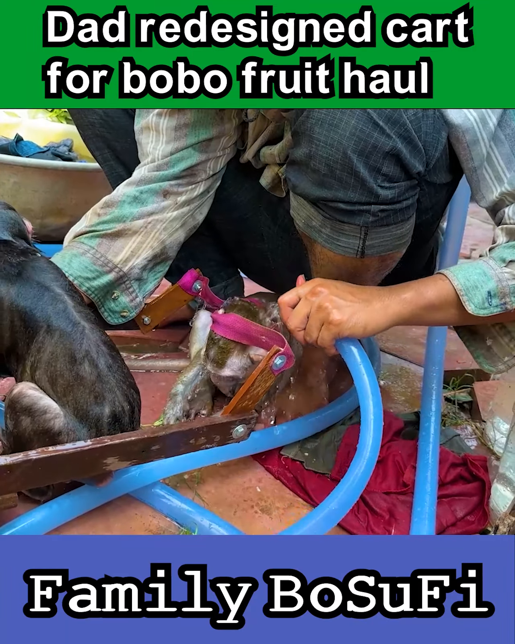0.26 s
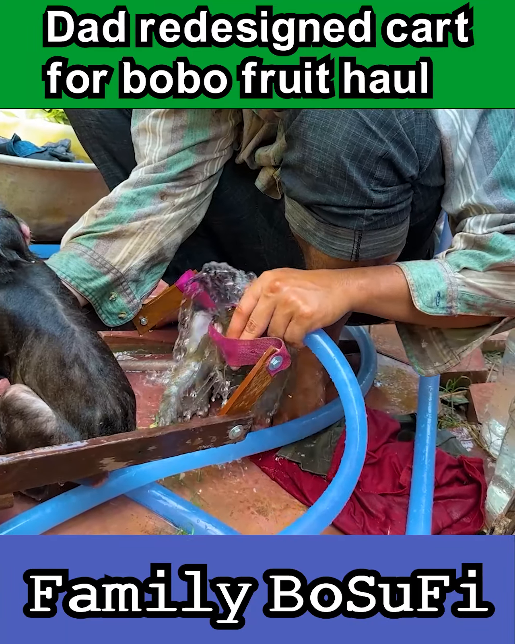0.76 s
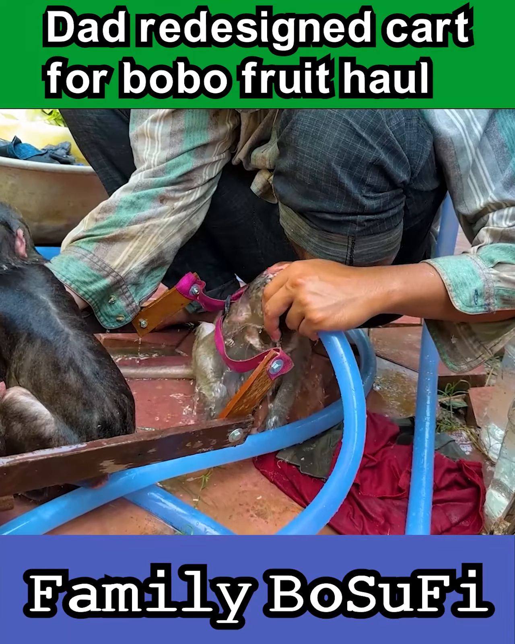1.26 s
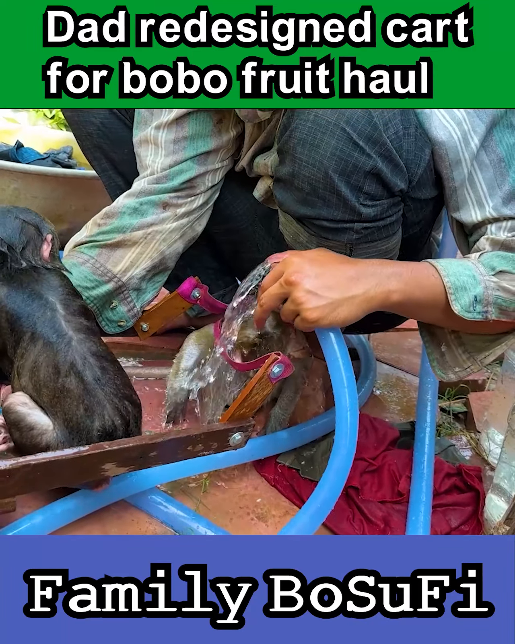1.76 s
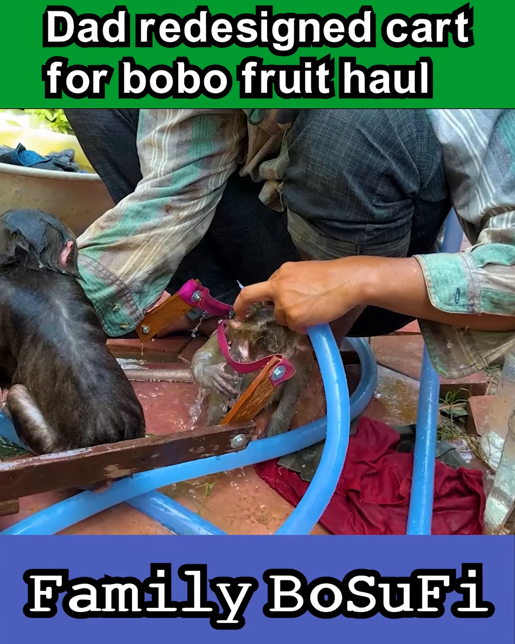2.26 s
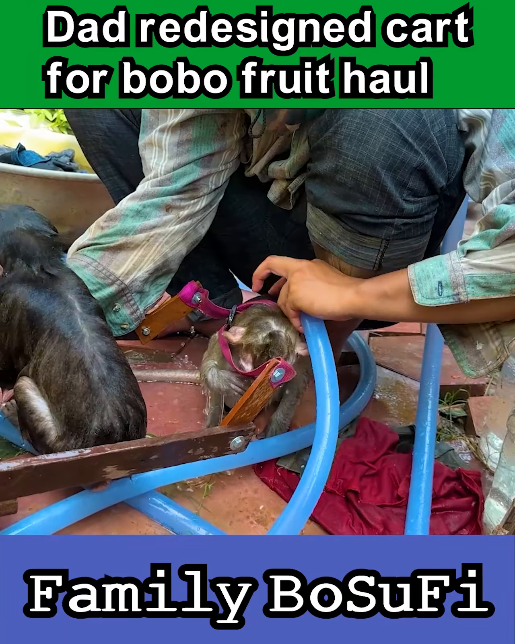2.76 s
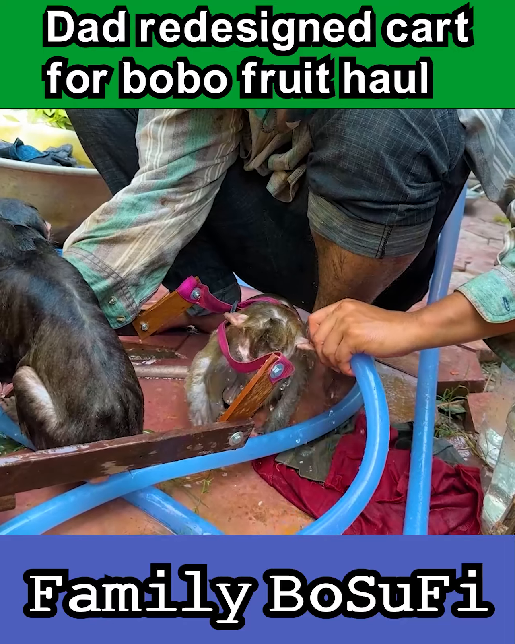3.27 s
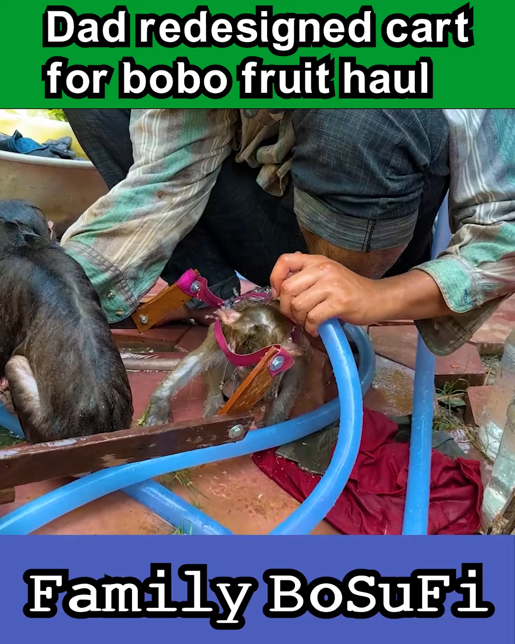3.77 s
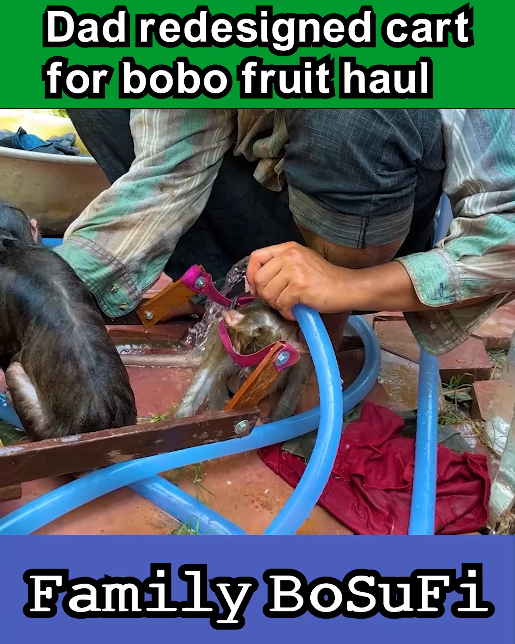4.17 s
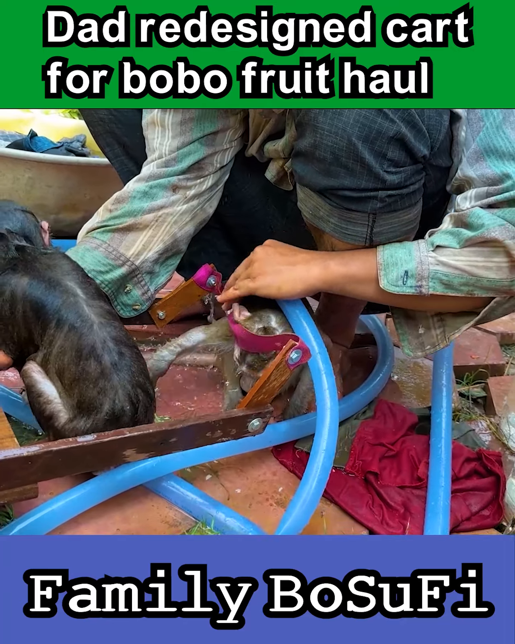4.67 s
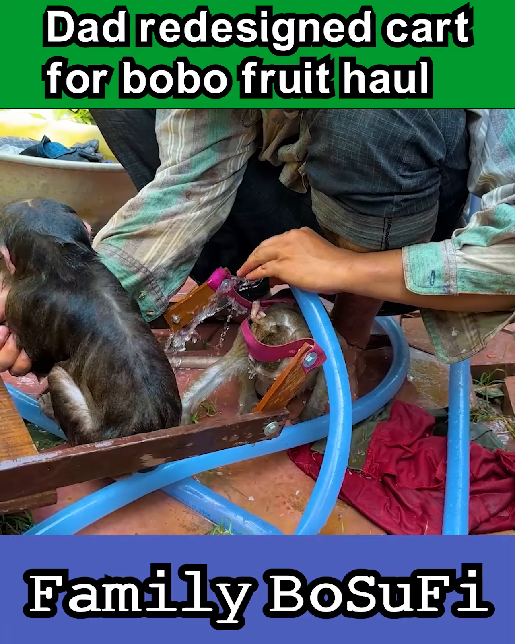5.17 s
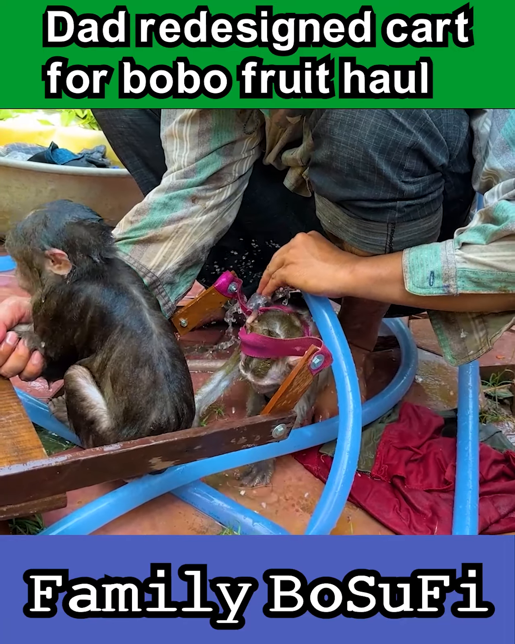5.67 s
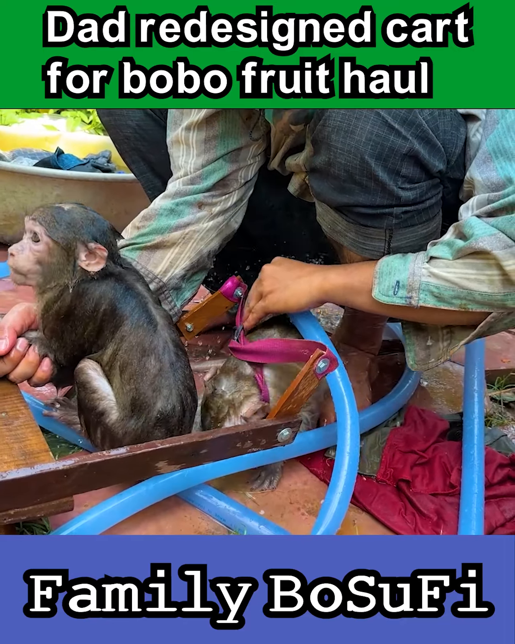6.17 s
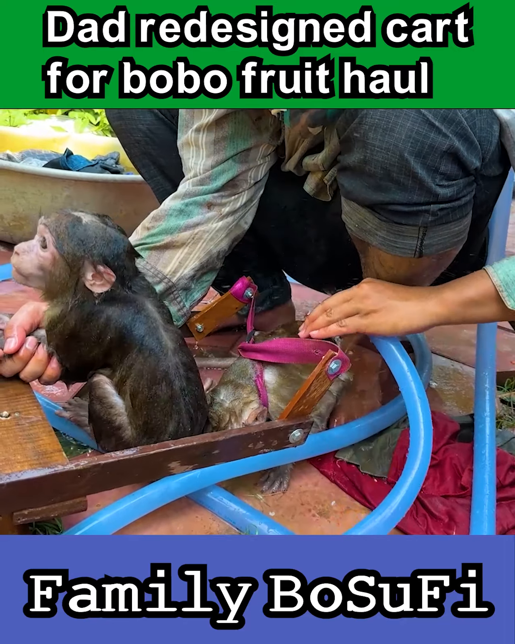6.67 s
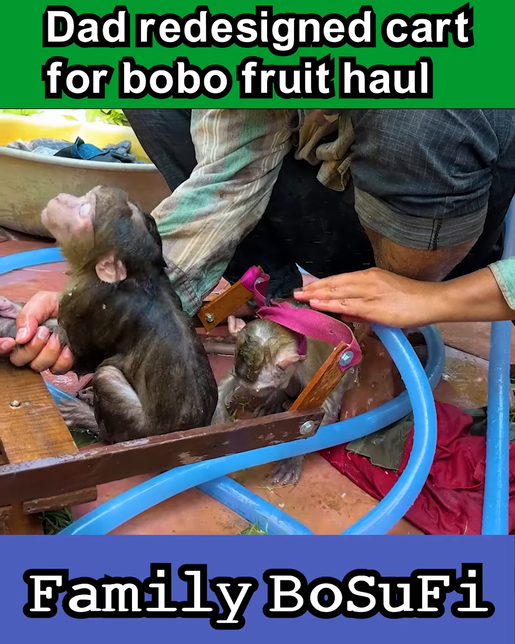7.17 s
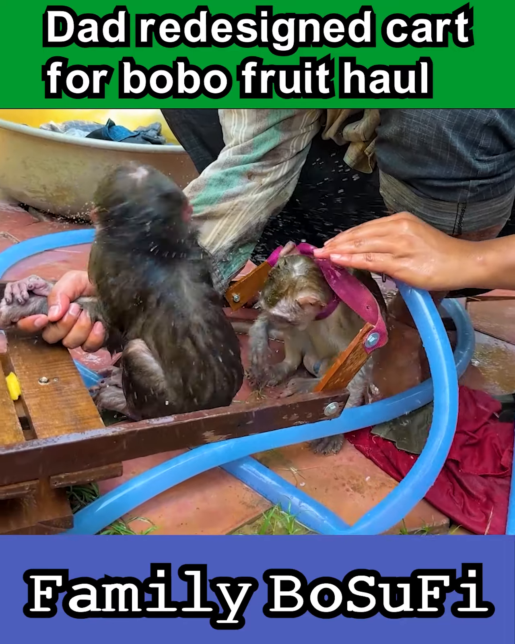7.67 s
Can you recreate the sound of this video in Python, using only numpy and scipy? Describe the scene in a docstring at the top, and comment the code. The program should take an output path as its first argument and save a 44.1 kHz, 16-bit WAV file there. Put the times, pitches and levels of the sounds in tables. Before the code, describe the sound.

Water from a garden hose fizzes, bubbles and splashes over a small wet animal on tiles, later drumming on something hollow above a low outdoor rumble.

```python
"""A garden hose runs over a small wet animal on a tiled yard, close by, above a low outdoor rumble with soft bumps.
From the start, noise shaped by droplet bursts fizzes, sine rings bubble and gurgle, and a few gouts tap something hollow.
Noise bursts then slap the tiles; a faint sine drone sinks from one to four seconds, and falling tones knock now and then.
The flow surges throughout and dips briefly near four seconds. From about five the jet strays onto the hollow thing and
drums on its resonances for two seconds, then fades to faint tapping under splashing, bubbling, rumble and a few knocks."""
import sys
import numpy as np
from scipy import signal
from scipy.fft import rfft, irfft, next_fast_len
from scipy.io import wavfile
from scipy.ndimage import uniform_filter1d, map_coordinates

SR = 44100
rng = np.random.default_rng(int(sys.argv[2]) if len(sys.argv) > 2 else 0)


def transcribe(u):
    """Save the signal u as a 16-bit wav file named by the first command-line argument.

    u: samples, shape (n,) or (channels, n), limited to [-1, 1]; the rate is SR.
    q: integer samples, one column per channel.
    """
    v = np.clip(np.atleast_2d(u).T, -1, 1)
    q = np.round(v * 32767).astype(np.int16)
    wavfile.write(sys.argv[1], SR, q)


N = 349272


def amp(db):
    """Decibels to gain."""
    return 10 ** (np.asarray(db) / 20)


def unit(x):
    """Scale to rms 1."""
    return x / np.sqrt(np.mean(x ** 2) + 1e-20)


def along(points, hz):
    """Read (Hz, value) points on a log frequency axis."""
    f, v = np.transpose(points)
    return np.interp(np.log(hz + 1), np.log(f + 1), v)


def curves(rows):
    """One value per sample for each column after the time."""
    s, *cols = np.transpose(rows)
    return [np.interp(np.arange(N) / SR, s, c) for c in cols]


def wobble(rate):
    """A smooth random curve, rate knots a second."""
    knots = rng.standard_normal(int(N * rate / SR) + 4)
    return map_coordinates(knots, [np.arange(N) * rate / SR])


def filtered(x, response):
    """Shape the spectrum of x by a response of frequency."""
    m = next_fast_len(N + 8192)
    hz = np.fft.rfftfreq(m, 1 / SR)
    return irfft(rfft(x, m) * response(hz), m)[..., :N]


def add(track, s, sound):
    """Mix a sound into a track at time s."""
    start = max(round(s * SR), 0)
    part = track[..., start:start + sound.shape[-1]]
    part += sound[..., :part.shape[-1]]


def fade(t, attack, t60):
    """A soft start and an exponential decay, peak 1."""
    t = np.maximum(t, 0)
    shape = (1 - np.exp(-t / attack)) * 1000 ** (-t / t60)
    return shape / (shape.max(axis=-1, keepdims=True) + 1e-12)


# stereo width of the noise: hz, side_minus_mid_db
WIDTH = [(60, -16), (130, -10.5), (450, -16.5), (750, -5.5), (1400, -13.5), (2400, 1), (5000, -13),
         (7000, -5.5), (9400, -3.5), (10700, -11.5), (13400, -17), (15700, -9)]


def noise(spectrum):
    """Coloured stereo noise whose mid has rms 1; the width varies with frequency."""
    def colour(hz):
        width = np.array([np.ones_like(hz), amp(along(WIDTH, hz))])
        return amp(along(spectrum, hz)) * width
    mid, side = filtered(rng.standard_normal((2, N)), colour)
    return np.array([mid + side, mid - side]) / np.std(mid)


def tinted(x, depth_db, size):
    """Give droplets their own colour: random gain patches, a few milliseconds long and size bins wide."""
    z = signal.stft(x, nperseg=128)[2]
    field = rng.standard_normal(z.shape[1:])
    for _ in range(2):
        field = uniform_filter1d(field, size=size, axis=0)
        field = uniform_filter1d(field, size=3, axis=1)
    gains = unit(amp(depth_db * unit(field)))
    return signal.istft(z * gains, nperseg=128)[1][:, :N]


def impacts(rate, spread_db):
    """Random impulses, on average rate a second, with clipped log-normal sizes."""
    sizes = amp(spread_db * np.clip(rng.standard_normal(N), -2.3, 2.3))
    return (rng.random(N) < rate / SR) * sizes


def shower(rate, spread_db, t60):
    """Envelope of rms 1 of many droplets, each a tiny burst, summed in power."""
    burst = fade(np.arange(SR // 20) / SR, 0.00013, t60)
    power = signal.fftconvolve(impacts(rate, spread_db) ** 2, burst ** 2)[:N]
    return unit(np.sqrt(np.abs(power)))


def bubble(t, hz, t60, rise, attack):
    """A ringing air pocket: a dying sine whose pitch climbs with positive rise, falls with negative."""
    return fade(t, attack, t60) * np.sin(2 * np.pi * hz * t * (1 + rise * t / t60))


def bubbles(count, centre_hz, octaves, cycles, spread_db, rise):
    """A stereo cloud of rms 1 of bubbles; the small, high ones tend to die sooner."""
    start = rng.integers(0, N, count)
    pitch, life, size, place, pan = np.clip(rng.standard_normal((count, 5)), -2, 2).T[..., None]
    hz = np.minimum(centre_hz * 2 ** (octaves * pitch), SR / 4)
    t60 = cycles / hz * amp(8.7 * life)
    t = np.arange(SR // 45) / SR
    positions = (start[:, None] + np.arange(len(t))).ravel()
    ports = []
    for side in (1, -1):
        level = amp(spread_db * size + side * 2 * pan)
        rings = level * bubble(t + side * place * 5e-5, hz, t60, rise, 0.00084)
        ports.append(np.bincount(positions, rings.ravel(), N)[:N])
    return unit(np.array(ports))


def ragged(t, hz, t60, width):
    """A torn air pocket: a dying band of noise around hz, its width a share of the pitch."""
    knots = rng.standard_normal(size=512)
    rough = np.interp(t * hz * width, np.arange(len(knots)), knots)
    return fade(t, 0.00046, t60) * rough * np.sin(2 * np.pi * hz * t)


# the stream surges (+) as it catches the animal, or dips (-) as the hand checks it: start_s, length_s, change_db
SURGES = [(0.84, 0.21, 4.5), (1.64, 0.077, 6), (1.766, 0.17, 10), (1.972, 0.095, 11), (3.212, 0.13, 10),
          (3.405, 0.15, 3.5), (3.704, 0.13, -6.5), (4.05, 0.076, -7), (4.203, 0.051, 5.5),
          (4.954, 0.084, 7.5), (5.049, 0.091, -7), (5.306, 0.095, 4.5), (6.123, 0.16, -5),
          (6.281, 0.24, 6.5), (7.52, 0.15, 6.5), (7.721, 0.028, -3), (7.828, 0.078, 10.5)]
SURGE_ATTACK_S, SURGE_RELEASE_S = 0.045, 0.038


def surge():
    """Change of the flow in dB: each surge or dip rises, holds and releases."""
    t = np.arange(N) / SR
    total = 0
    for s, length, db in SURGES:
        attack = (t - s) / SURGE_ATTACK_S
        release = 1 - (t - s - length) / SURGE_RELEASE_S
        total = total + db * np.clip(np.minimum(attack, release), 0, 1)
    return total


# slow levels as the hose is moved about, before trims and sway: time_s, splash_db, mist_db, gurgle_db
FLOW = [(0.0, -57, -63, -51.5), (0.65, -47.5, -48, -50), (1.3, -46.5, -52, -56), (2.4, -50, -54, -51),
        (3.12, -51, -57.5, -51.5), (3.6, -52, -52.5, -44.5), (4.3, -46.5, -51.5, -61.5),
        (4.55, -48, -48.5, -48), (5.65, -45, -45.5, -46.5), (6.65, -46.5, -51, -47.5),
        (7.3, -49, -51.5, -43.5), (7.92, -53.5, -58.5, -46)]
# colours of splash, fine mist and hollow wash: hz, relative_db
SPLASH = [(300, -2), (900, -35.5), (1600, -4.5), (2400, -2), (3000, -3.5), (3700, 1), (4700, 2.5),
          (6500, -3.5), (9000, -13), (12000, -15.5)]
MIST = [(3000, -42), (6500, -0.5), (8300, 2), (9400, 6), (10000, 2.5), (10800, 2.5), (12300, 5.5),
        (13500, 10), (14800, 5), (15700, 6)]
WASH = [(100, -42), (220, 6), (340, 9.5), (480, 13), (580, 4), (680, 12), (880, -1.5), (1200, 9.5),
        (1500, -5.5), (2200, 1), (3000, -4), (6000, -12.5)]
MIST_FOLLOWS, GURGLE_FOLLOWS = 1, 0.55  # dB per dB of surge
SPLASH_DB, MIST_DB, GURGLE_DB = -2.0, 1.58, 0.13  # trims of the three layers
CLUMP_DB, CLUMPS_PER_S = 2, 43  # the water arrives in clumps
SWAY_DB, SWAYS_PER_S = 1.4, 12  # each layer also wavers on its own


def stream():
    """The stream breaks into droplets, mist and bubbles, which arrive in clumps."""
    splash_db, mist_db, gurgle_db = [level + SWAY_DB * wobble(SWAYS_PER_S) for level in curves(FLOW)]
    push = surge()
    splash_db = splash_db + SPLASH_DB + push
    mist_db = mist_db + MIST_DB + MIST_FOLLOWS * push
    gurgle_db = gurgle_db + GURGLE_DB + GURGLE_FOLLOWS * push
    clumps = CLUMP_DB * wobble(CLUMPS_PER_S)

    drops = shower(rate=380, spread_db=15.5, t60=0.024)
    splash = tinted(noise(SPLASH), depth_db=4.0, size=3) * (amp(-4.0) * drops + amp(-7.5))
    droplets = shower(rate=550, spread_db=9.0, t60=0.015)
    mist = tinted(noise(MIST), depth_db=3.0, size=8) * (amp(-2.5) * drops + amp(-2) * droplets)

    prickle = amp(-11.5) * bubbles(count=700, centre_hz=8150, octaves=0.2, cycles=70, spread_db=8, rise=0.02)
    plinks = bubbles(count=2000, centre_hz=4200, octaves=.42, cycles=22, spread_db=5, rise=.05)
    ticks = bubbles(count=2000, centre_hz=2300, octaves=.8, cycles=6, spread_db=6, rise=-.05)
    fizz = amp(-5) * plinks + amp(-13.5) * ticks

    pockets = bubbles(count=2600, centre_hz=1900, octaves=.5, cycles=14, spread_db=4, rise=.02)
    gurgle = amp(-9.0) * pockets
    # cavities that close again give short, falling glugs
    glugs = amp(-13.0) * bubbles(count=600, centre_hz=835, octaves=0.536, cycles=8.7, spread_db=2, rise=-0.08)
    wash = amp(-3.0) * noise(WASH) * shower(rate=240, spread_db=9.5, t60=0.088)

    bright = amp(splash_db) * (splash + fizz)
    fine = amp(mist_db) * (mist + prickle)
    low = amp(gurgle_db) * (gurgle + glugs + wash)
    return amp(clumps) * (bright + fine + low)


# rumble level before trim and waver: time_s, level_db
RUMBLE = [(0.0, -44.5), (0.5, -52.5), (1.4, -43.5), (2.5, -46.5), (3.92, -46), (4.08, -56.5), (4.54, -47),
          (6.35, -37), (6.8, -41.5), (7.25, -36.5), (7.92, -49.5)]
# rumble colour: hz, relative_db
LOW = [(20, -50), (30, -45), (42, -8.5), (60, 0), (95, -0.5), (125, -1.5), (165, -7), (260, -14.5),
       (600, -27), (2000, -49)]
# soft bumps: start_s, peak_db, pitch_hz, t60_s
BUMPS = [(0.669, -24.5, 79.5, 0.074), (1.369, -33.5, 61, 0.2), (2.951, -35.5, 60, 0.29),
         (3.926, -31.5, 123, 0.055), (6.368, -24.5, 65, 0.24)]
# a faint drone that sinks in pitch and dies away, before its waver: time_s, pitch_hz, level_db
DRONE = [(1.0, 128.5, -66), (1.25, 128.1, -44.5), (1.65, 128.2, -47.5), (2.0, 123, -50), (2.4, 117, -56),
         (2.8, 107.6, -42), (3.2, 108, -52.5), (4.1, 108.4, -66)]
DRONE_WAVER_DB, DRONE_WAVER_HZ = 2.5, 3


def rumble():
    """Low outdoor rumble of coloured noise, a wavering sine drone and bumps of dying low sines."""
    hz, drone_db = curves(DRONE)
    drone_level = amp(drone_db + DRONE_WAVER_DB * wobble(8.8))
    phase = 2 * np.pi * np.cumsum(hz + DRONE_WAVER_HZ * wobble(28.07)) / SR
    drone = drone_level * np.sin(phase)
    rumble_level = amp(curves(RUMBLE)[0] - 2.0 + 1.44 * wobble(12))
    out = rumble_level * noise(LOW) + drone
    t = np.arange(SR // 4) / SR
    for s, db, hz, t60 in BUMPS:
        add(out, s, amp(db) * bubble(t, hz, t60, rise=0, attack=0.0028))
    return out


# the biggest air pockets, levels before trims: start_s, level_db, pitch_hz, t60_s
PLOPS = [(0.034, -28.5, 3380, 0.013), (0.073, -29, 4200, 0.016), (0.342, -43, 1020, 0.0097),
         (0.364, -35.5, 1030, .018), (0.503, -32, 2510, 0.016), (0.593, -25, 8240, 0.011),
         (0.604, -29, 1220, 0.02), (0.605, -31.5, 4140, 0.015), (0.634, -28, 7790, .008),
         (1.014, -28.5, 910, 0.024), (1.058, -19.5, 4230, 0.0088), (1.173, -22.5, 3150, 0.014),
         (1.537, -36, 1240, 0.035), (1.861, -16, 2140, 0.012), (1.915, -25, 4050, 0.017),
         (1.946, -27, 1865, 0.028), (2.009, -30, 4800, .012), (2.207, -27, 1290, 0.025),
         (2.218, -33.5, 3420, .022), (2.333, -20.5, 1310, 0.043), (2.471, -27.5, 2310, 0.011),
         (2.624, -30, 3415, 0.022), (2.625, -30.5, 2320, 0.0091), (2.823, -36, 1700, 0.022),
         (2.95, -21.5, 1115, 0.038), (3.436, -29, 4300, 0.013), (3.452, -24, 4880, 0.013),
         (3.501, -19.5, 2470, 0.0096), (3.528, -30, 4100, 0.011), (3.618, -33, 4260, 0.014),
         (3.628, -35, 2490, 0.035), (3.777, -31.5, 2300, 0.018), (3.837, -27, 2360, 0.014),
         (4.224, -28.5, 3510, .018), (4.235, -34, 1640, 0.028), (4.293, -35, 1700, 0.03),
         (5.315, -31.5, 1850, .022), (5.345, -23.5, 1677, 0.033), (6.443, -25, 3340, 0.039),
         (7.021, -21.5, 3830, 0.015), (7.311, -29, 1584, 0.043), (7.323, -27.5, 1474, 0.027),
         (7.499, -33.5, 1200, 0.034), (7.525, -28.5, 1170, .032), (7.555, -34, 1130, 0.03),
         (7.6, -30, 1190, 0.026), (7.608, -28, 1205, 0.024), (7.681, -34, 2187, 0.067),
         (7.684, -33, 1600, .014), (7.893, -21, 2214, 0.086), (7.893, -21.5, 1124, 0.041)]
TWIN_S, TWIN_DB, TWIN_RATIO = 0.0091, -23, 1.3  # the smaller pocket shed: delay, level, pitch ratio
CHIRP_S = 0.0036  # a pocket with this t60 triples its pitch within it; longer-lived ones rise far less


def plops():
    """Large air pockets ring clearly, and each sheds a smaller one."""
    out, t = np.zeros((2, N)), np.arange(SR // 8) / SR
    spatter = np.zeros(N)
    for s, db, hz, t60 in PLOPS:
        ports = t + rng.normal(0, 2e-5) * np.array([[1], [-1]])  # a tiny time offset between the ports
        clear = amp(db - 3.0) * bubble(ports, hz, t60, rise=(CHIRP_S / t60) ** 2, attack=0.0016)
        torn = amp(db - 10.0) * ragged(ports, hz, t60, width=0.48)
        add(out, s, clear + torn)
        twin = bubble(ports, hz * TWIN_RATIO, t60, rise=0.029, attack=0.00013)
        add(out, s + TWIN_S, amp(db + TWIN_DB) * twin)
        add(spatter, s, amp(db - 27.0) * fade(t, 0.0015, t60))  # the drop that traps the air
    return out + spatter * noise(SPLASH)


# runs of bubbles where the water pools, levels before trim and scatter: start_s, length_s, level_db, pitch_hz
TRICKLES = [(0.14, .12, -40.5, 1590), (1.139, .06, -29, 3740), (1.709, .04, -39, 960),
            (2.196, .05, -38, 1290), (3.243, .11, -37.5, 905), (3.486, .06, -30, 3200),
            (4.426, .06, -34, 1910), (4.638, .22, -43, 545), (5.292, .05, -26, 2030),
            (7.811, .04, -36, 1600)]
TRICKLE_GAP_S, TRICKLE_CYCLES = 0.014, 31  # time from bubble to bubble, ring length
TRICKLE_OCTAVES, TRICKLE_SPREAD_DB = 0.26, 1  # scatter of pitch and level


def trickles():
    """Pooling water traps one bubble after another, all of about the same size."""
    out, t = np.zeros((2, N)), np.arange(SR // 16) / SR
    for start, length, db, hz in TRICKLES:
        scatter = np.clip(rng.standard_normal((16, 4)), -2, 2)
        for k, (late, pitch, size, place) in enumerate(scatter):
            if k * TRICKLE_GAP_S < length:
                own_hz = hz * 2 ** (TRICKLE_OCTAVES * pitch)
                ports = t + place * 5e-5 * np.array([[1], [-1]])
                ring = bubble(ports, own_hz, TRICKLE_CYCLES / own_hz, rise=0.018, attack=0.0011)
                level = amp(db - 6.5 + TRICKLE_SPREAD_DB * size)
                add(out, start + (k + .3 * late) * TRICKLE_GAP_S, level * ring)
    return out


def causal(spectrum):
    """The minimum-phase impulse response of a body with this spectrum, peak 1."""
    size = 4096
    cepstrum = irfft(np.log(amp(along(spectrum, np.fft.rfftfreq(size, 1 / SR)))))
    # fold the cepstrum so that the response starts at once
    cepstrum[1:size // 2] *= 2
    cepstrum[size // 2 + 1:] = 0
    response = irfft(np.exp(rfft(cepstrum)))
    return response / np.abs(response).max()


# heavy gouts that beat on the hollow surface, levels before trims: start_s, level_db
GOUTS = [(0.143, -33), (0.36, -42), (0.442, -34.5), (0.575, -36), (1.09, -44), (1.138, -34), (1.479, -31.5),
         (1.719, -30), (1.834, -31), (2.14, -37), (2.964, -29), (5.154, -27.5), (5.389, -27), (5.433, -27),
         (5.504, -26), (5.552, -22), (5.581, -24.5), (5.651, -23), (5.681, -23.5), (5.719, -26),
         (5.748, -21), (5.784, -26), (5.811, -20), (5.838, -18.5), (5.857, -19), (5.883, -18.5),
         (5.908, -19.5), (5.921, -16.5), (5.946, -20), (5.959, -21), (5.969, -24.5), (5.997, -20.5),
         (6.018, -27), (6.057, -16), (6.072, -17), (6.093, -20), (6.11, -21), (6.127, -19), (6.148, -21),
         (6.175, -17.5), (6.2, -15.5), (6.232, -13), (6.252, -19), (6.271, -16), (6.288, -18.5),
         (6.311, -18.5), (6.337, -18.5), (6.386, -10.5), (6.406, -18), (6.434, -14.5), (6.445, -13),
         (6.455, -21), (6.484, -15), (6.5, -19), (6.514, -17.5), (6.573, -13.5), (6.596, -18),
         (6.639, -13.5), (6.669, -17), (6.702, -16.5), (6.749, -19), (6.77, -17), (6.795, -16.5),
         (6.814, -22), (6.839, -18.5), (6.853, -18), (6.881, -20), (6.929, -17.5), (6.952, -19),
         (6.975, -17.5), (6.999, -19.5), (7.012, -22), (7.043, -33), (7.079, -22.5), (7.163, -24),
         (7.283, -30)]
# small drops between the gouts, levels before lift, scatter and trims: time_s, level_db
PATTER = [(4.9, -46), (5.1, -35), (5.5, -38), (5.9, -30), (6.45, -29.5), (7.0, -33), (7.25, -39),
          (7.92, -47)]
# response of the hollow body to a blow, before detuning: hz, relative_db
HOLLOW = [(60, -58), (100, -64), (155, -26.5), (215, -14.5), (320, -12.5), (400, -9), (460, 3.5), (495, -4),
          (548, -35), (600, -25), (675, -16.5), (770, -35), (850, -22.5), (1070, -32), (1270, -21),
          (1450, -29), (1650, -26), (1900, -45), (2300, -35), (6000, -53)]
DROP_GAP_S, DROP_SCATTER = .014, .3  # mean time between drops, and its scatter as a share
DROP_DB, DROP_SPREAD_DB = 2.5, 3.5  # lift of a drop over the patter level, and range either way
GATHER_S = .013  # no drops fall for this long while a gout gathers
TOUCH_S = 0.0029  # the water touches the surface this long before its full push
DAMP_S, DAMP_SPREAD_DB = .35, 5  # t60 added by water lying on the surface, and its variation per blow
BREAKUP_DB, BREAKUP_FOLLOWS = -16.5, -0.42  # rough tail at 0 dB, and dB per dB: weak gouts fall apart more


def blow(db):
    """A push with a rough, collapsing tail; the spot and the load of water detune and damp the body."""
    t = np.arange(SR // 25) / SR
    detune, load = np.clip(rng.standard_normal(2), -1.5, 1.5)
    body = causal(np.array(HOLLOW) * [amp(0.17 * detune), 1])
    damp_t60 = DAMP_S * amp(DAMP_SPREAD_DB * load)
    body = body * amp(-60 * np.arange(len(body)) / SR / damp_t60)
    push = fade(t - TOUCH_S, .0001, 0.0015)
    breakup = amp(BREAKUP_DB + BREAKUP_FOLLOWS * db) * fade(t, 0.0034, 0.022)
    force = push + breakup * rng.standard_normal(len(t))
    sound = signal.fftconvolve(force, body)
    return sound / np.abs(sound).max()


def drumming():
    """The jet breaks into gouts and small drops; each pushes the hollow surface, then spatters over it."""
    t = np.arange(SR // 25) / SR
    gap, size = rng.uniform(-1, 1, size=(220, 2)).T
    starts = PATTER[0][0] + np.cumsum(DROP_GAP_S * (1 + DROP_SCATTER * gap))
    levels = np.interp(starts, *np.transpose(PATTER)) + DROP_DB + DROP_SPREAD_DB * size
    ahead = np.array(GOUTS)[:, :1] - starts  # time from each drop to each gout
    falls = ~np.any((ahead > 0) & (ahead < GATHER_S), axis=0)
    blows, wet = np.zeros((2, N))
    for s, db in [*GOUTS, *zip(starts[falls], levels[falls])]:
        add(blows, s - TOUCH_S, amp(db - 2.5) * blow(db))
        add(wet, s, amp(db - 21.5) * fade(t, 0.0004, 0.016))
    return blows + wet * noise(WASH)


# the biggest lumps of water slapping the tiles, before trims: start_s, level_db, mist_relative_db
SLAPS = [(0.42, -37.5, 14), (0.468, -26, -10), (0.484, -30, -14), (0.58, -34, -4), (0.696, -28, 0),
         (0.802, -30, 8.5), (0.9246, -30, 10.5), (1.009, -20, -1), (1.026, -20, 3.5), (1.672, -22, 2),
         (1.862, -19, 3), (2.0753, -15.5, -8), (2.335, -22, -22), (2.47, -26.5, -15), (2.59, -23, -11),
         (3.176, -25, -14), (3.287, -22.5, -19), (3.5005, -39, -24), (4.04, -31, -4), (4.2205, -22, -16),
         (4.553, -22, 6), (4.789, -21.5, -23), (4.871, -27, -18), (4.948, -23.5, 3), (4.966, -36, -8),
         (5.2074, -21, -3), (5.3941, -17, -14), (5.5169, -16.5, -4.5), (5.5772, -18.5, 2.5),
         (5.717, -17, 1.5), (6.501, -17.5, -3), (6.568, -22, -6), (6.636, -45, -4), (6.972, -30.5, -5),
         (7.275, -23, -11), (7.8497, -36, 19)]
LEAD_S, LEAD_DB = 0.01, -18.5  # drops that land just ahead of a lump: lead, level


def slaps():
    """A few drops land first; then a lump of water bursts on the tiles and throws a short trail of spray."""
    t = np.arange(SR // 10) / SR
    first_drops = amp(LEAD_DB) * fade(t, .003, 0.039)
    lump = fade(t - LEAD_S, 0.00069, 0.02)
    trail = amp(-16.5) * fade(t - LEAD_S, 0.0029, 0.014)
    burst = first_drops + lump + trail
    body, spray = np.zeros((2, N))
    for s, db, mist_db in SLAPS:
        add(body, s - LEAD_S, amp(db - 10.5) * burst)
        add(spray, s - LEAD_S, amp(db + mist_db - 7.0) * burst)
    return body * noise(SPLASH) + spray * noise(MIST)


# short hollow smacks of water in fur and hand, levels before trims: start_s, level_db, start_pitch_hz, length_s
SMACKS = [(1.402, -32.5, 1440, 0.0036), (2.246, -40, 1800, 0.0068), (2.369, -38.5, 1920, .006),
          (3.1585, -32, 1840, 0.0045), (3.169, -27.5, 1207, 0.008), (3.1773, -24, 1340, 0.0031),
          (3.176, -28, 702, 0.011), (3.642, -36.5, 897, 0.0056), (3.9227, -20.5, 1940, 0.004),
          (3.924, -28, 850, 0.0036), (3.96, -31, 950, 0.0036), (4.033, -44, 515, 0.014),
          (4.445, -42.5, 930, 0.0085), (4.458, -45, 940, 0.0049), (4.473, -43, 1000, 0.0037),
          (4.493, -41, 1200, 0.0065), (4.519, -42.5, 940, 0.0046), (4.543, -39.5, 1000, 0.0094),
          (4.564, -37.5, 1160, 0.0055), (5.764, -31, 1370, 0.0048), (6.52, -24, 1700, 0.003),
          (6.977, -27, 1600, 0.0056), (7.234, -31, 403.3, 0.013), (7.399, -28.5, 647, 0.01),
          (7.618, -31.5, 570, 0.009)]
SMACK_FALL_OCTAVES = 1  # how far the pitch drops while the cavity closes


def smacks():
    """A flattened cavity closes within a few cycles: a dry knock that falls in pitch."""
    out, spatter, t = np.zeros(N), np.zeros(N), np.arange(SR // 30) / SR
    for s, db, hz, length in SMACKS:
        closed = np.minimum(t / length, 1)
        phase = 2 * np.pi * np.cumsum(hz * 2 ** (-SMACK_FALL_OCTAVES * closed)) / SR
        knock = amp(db) * np.sin(np.pi * closed ** 0.6) * np.sin(phase)
        torn = amp(db + 1.0) * ragged(t, hz / 2, 4 * length, width=0.78)
        add(out, s, knock + torn)
        add(spatter, s, amp(db - 8.5) * fade(t, 0.00018, 0.0066))
    return out + spatter * noise(SPLASH)


def yard(x, t60, above_hz):
    """Nearby surfaces return a brief scatter of the higher sounds, different at each port."""
    t = np.arange(SR // 3) / SR
    tail = rng.standard_normal((2, len(t))) * fade(t, 0.0011, t60)
    scatter = signal.fftconvolve(x, tail / np.linalg.norm(tail[0]), axes=1)[:, :N]
    return filtered(scatter, lambda hz: hz / np.hypot(hz, above_hz))


# stereo balance: hz, left_minus_right_db
LEAN = [(60, 0.5), (110, -1.5), (200, 0), (380, -2.5), (700, -3), (1290, -4.5), (2380, 0.5), (4400, -5),
        (8120, -2.5), (15000, 0.5)]
# phase by which the left port leads: hz, phase_rad
PORT_PHASE = [(60, -0.5), (450, 0.78), (1250, 1.43), (1650, 0.36), (2150, 1.8), (2700, -1.05),
              (3700, -1.58), (5700, -1), (7000, -2.5), (8300, 0), (9900, 3), (10900, 3), (12500, 5.5),
              (13700, 6.5), (16000, 9)]


def scene():
    """The mix leans mostly to the right and reaches the two ports out of step."""
    water = stream() + slaps() + plops() + drumming() + trickles()
    dry = water + smacks() + amp(-9.5) * yard(water, t60=0.15, above_hz=130) + rumble()
    half = np.array([[1], [-1]]) / 2  # each port takes half of the difference

    def placement(hz):
        return amp(half * along(LEAN, hz)) * np.exp(1j * half * along(PORT_PHASE, hz))
    return filtered(dry, placement)


TOP_HZ = 15900


def record(dry):
    """A steep low-pass removes nearly everything above the band limit."""
    return filtered(dry, lambda hz: 1 / (1 + (hz / TOP_HZ) ** 160))


dry = scene()
out = record(dry)
transcribe(out)
```